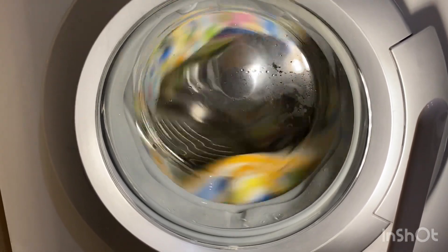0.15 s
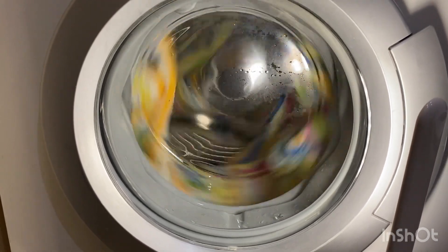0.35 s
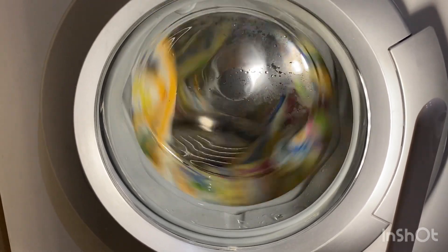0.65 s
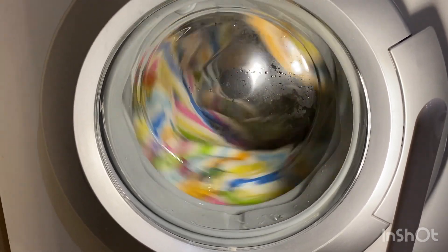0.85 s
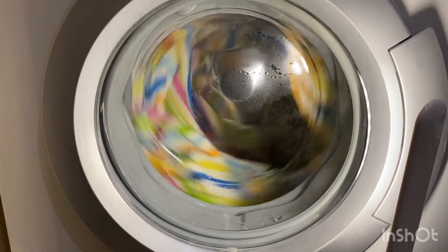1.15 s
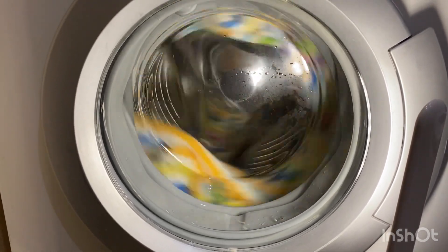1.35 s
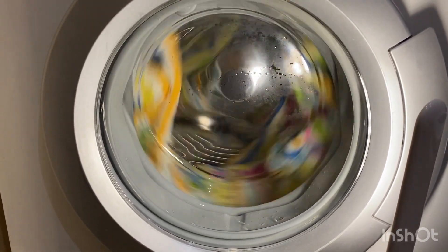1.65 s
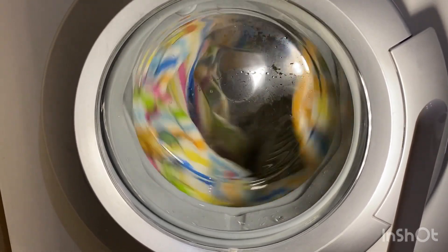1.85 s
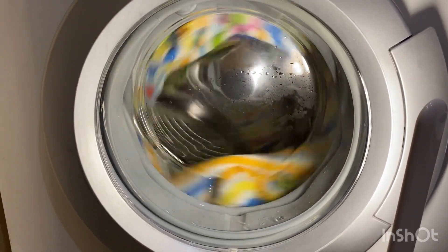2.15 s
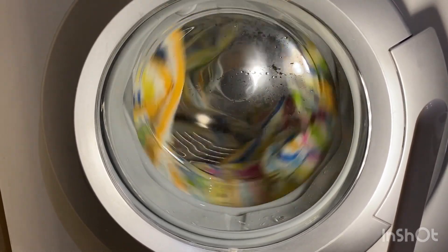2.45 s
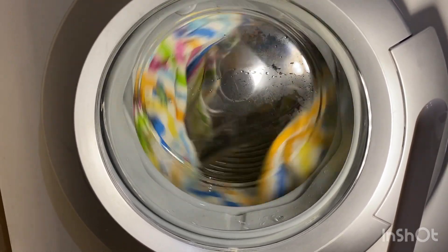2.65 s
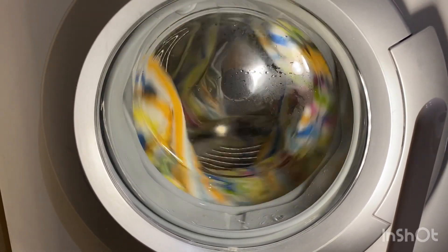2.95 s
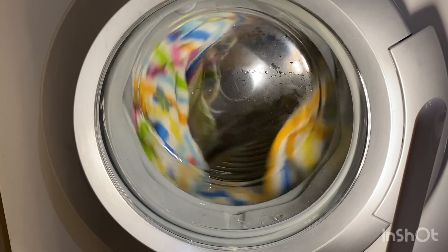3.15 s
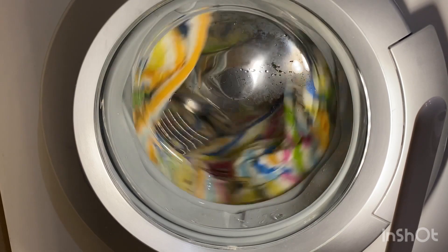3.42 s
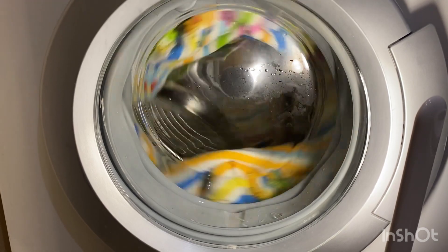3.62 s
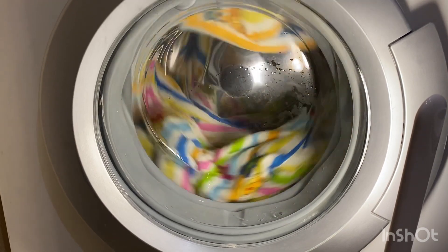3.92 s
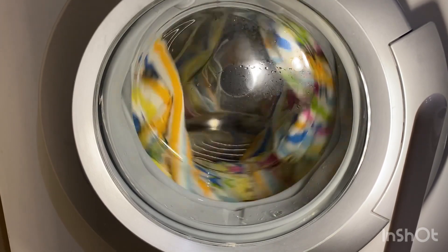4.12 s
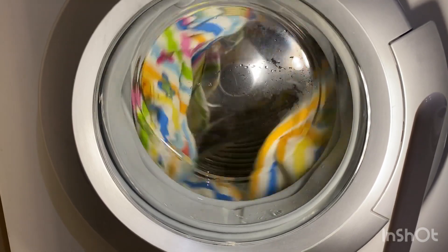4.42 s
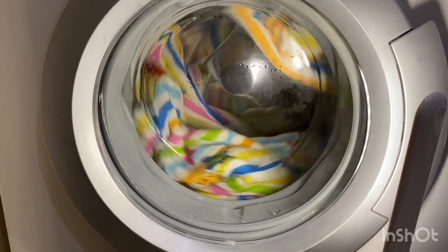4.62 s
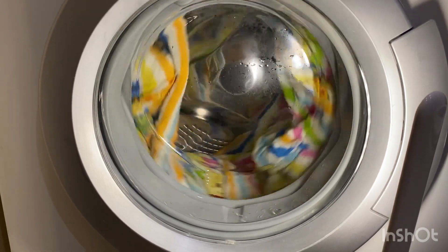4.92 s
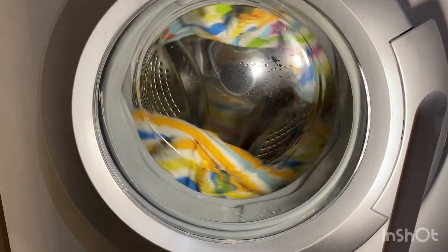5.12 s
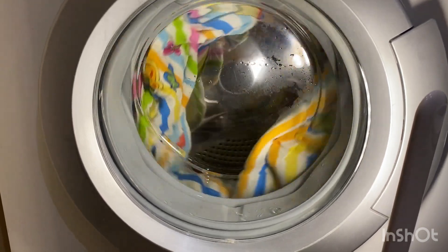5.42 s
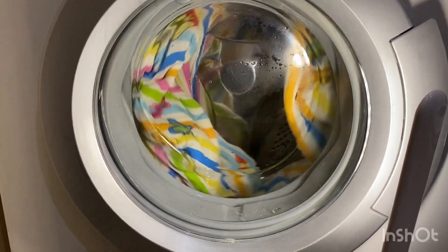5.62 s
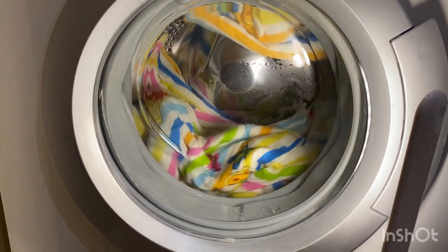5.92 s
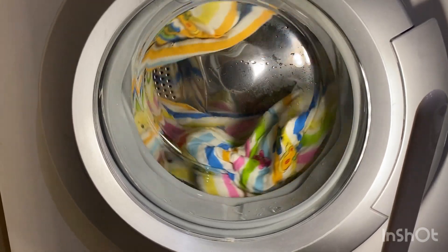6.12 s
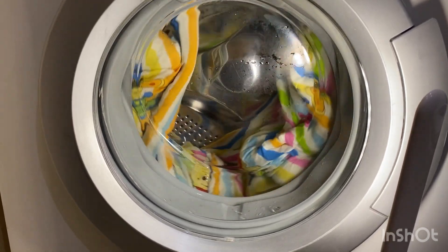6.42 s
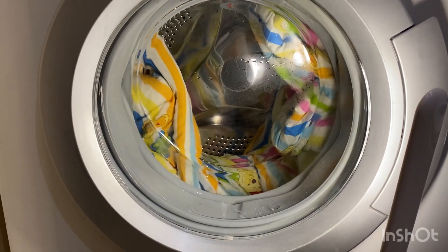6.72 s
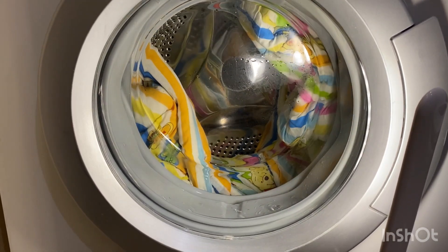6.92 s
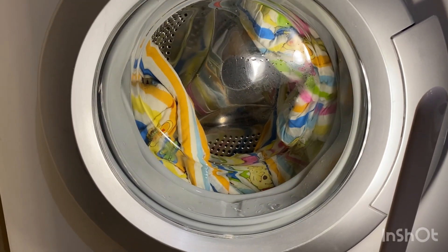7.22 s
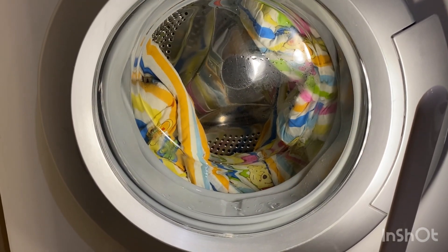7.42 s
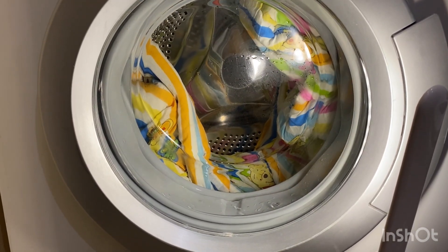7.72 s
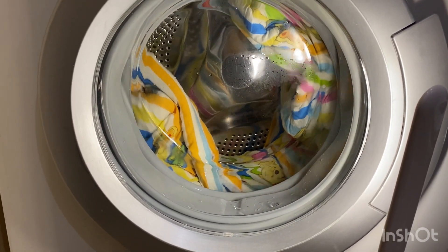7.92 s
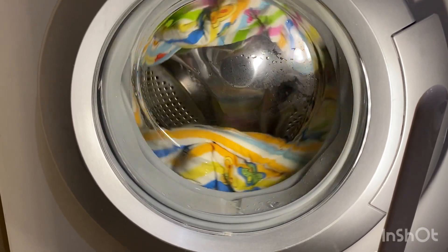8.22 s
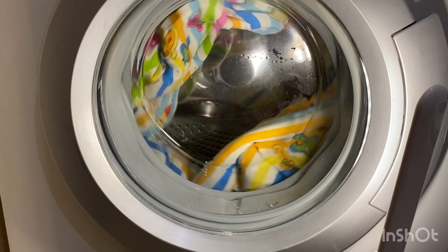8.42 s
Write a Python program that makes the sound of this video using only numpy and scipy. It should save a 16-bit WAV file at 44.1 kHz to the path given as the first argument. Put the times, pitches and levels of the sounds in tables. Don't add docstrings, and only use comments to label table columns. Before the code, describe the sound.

A low electric hum throbs irregularly, with turbulent water rushing and splashing inside a metal cabinet. Over it, a thin drum motor whine and scraping hiss sink in pitch until the drum rests. Wet cloth thuds softly now and then. Near the end a relay snaps and the motor begins to speed up. Close stereo microphone, small indoor room, slightly dulled extreme treble.

```python
import sys
import numpy as np
from scipy import signal
from scipy.fft import rfft, irfft, next_fast_len
from scipy.io import wavfile
from scipy.ndimage import uniform_filter1d

SR = 44100
rng = np.random.default_rng(int(sys.argv[2]) if len(sys.argv) > 2 else 0)


def linear_from_db(decibels):
    return 10 ** (np.asarray(decibels, float) / 20)


def digitize_waveform(pressure):
    field = np.atleast_2d(pressure).T
    bounded = np.clip(field, -1, 1)
    quanta = np.round(bounded * 32767).astype(np.int16)
    wavfile.write(sys.argv[1], SR, quanta)


N = 377496

MAINS_HZ = 50.0
BARS = 12


def evened(x):
    return x / np.sqrt(np.mean(x ** 2) + 1e-20)


def wander(count, size):
    once = uniform_filter1d(rng.standard_normal(count), size=size)
    return evened(uniform_filter1d(once, size=size))


def drift(span_s):
    return wander(N, max(int(span_s * SR), 2))


def read(points, hz):
    f, value = np.transpose(points)
    return np.interp(np.log(hz + 1), np.log(f + 1), value)


def band(x, low_hz, high_hz):
    return signal.sosfilt(signal.butter(2, [low_hz, high_hz], "band", fs=SR, output="sos"), x)


def bumps(rows, t, idle_db, sharpness=1, rise=1):
    few = t[::64]
    bells = 0
    for s, db, half_s in rows:
        reach_s = np.where(few < s, rise * half_s, half_s)
        bells = bells + linear_from_db(db) * np.exp(-sharpness * ((few - s) / reach_s) ** 2)
    return np.interp(t, few, 20 * np.log10(linear_from_db(idle_db) + bells))


def hiss(shape_db, patchy_db, ripple_db):
    frames, hz = N // 1024 + 5, np.fft.rfftfreq(4096, 1 / SR)
    a, b, c, d, patches = rng.standard_normal((frames, len(hz), 5)).T
    patches = uniform_filter1d(patches, size=40, axis=0)
    patches = evened(uniform_filter1d(patches, size=4, axis=1))
    ripple = evened(uniform_filter1d(rng.standard_normal(len(hz)), size=3))
    ripple *= (hz > 950) & (hz < 8000)
    level_db = (shape_db(hz) + ripple_db * ripple)[:, None] + patchy_db * patches
    z = np.array([a + 1j * b, c + 1j * d]) * linear_from_db(level_db)
    return evened(signal.istft(z, nperseg=4096, noverlap=3072)[1][:, :N])


def pump_load(t):
    # time in seconds, hum in dB, half length in seconds,
    # fourth multiple relative to hum in dB.
    gulps = [(0.191, -23, 0.12, -20), (0.393, -25, 0.078, -24), (0.662, -27.8, 0.08, -32.0),
             (0.892, -25.5, 0.16, -20), (1.224, -24.5, 0.15, -20), (1.47, -33, 0.064, -32.0),
             (1.837, -21.5, 0.25, -17.5), (2.355, -28, 0.17, -22.4), (2.51, -28.5, 0.089, -15),
             (2.62, -37.5, 0.17, -6), (2.965, -28.5, 0.15, -27.2), (3.13, -36.1, 0.029, -10),
             (3.294, -23.5, 0.11, -20.5), (3.455, -36, 0.036, -8.0), (3.72, -31, 0.052, -6),
             (3.864, -27.2, 0.29, -24), (4.587, -21, 0.27, -16.5), (4.802, -38, 0.038, -16.1),
             (5.139, -23.5, 0.14, -19), (5.488, -29.5, 0.114, -35), (5.735, -21.6, 0.15, -18),
             (5.97, -25.5, 0.035, -17.9), (6.17, -26, 0.38, -18.5), (6.528, -32.5, 0.038, -23),
             (6.81, -39.4, 0.038, -9), (6.874, -24.5, 0.38, -19.5), (7.348, -26, 0.13, -21),
             (7.69, -20, 0.16, -14), (8.117, -21.0, 0.28, -14.5), (8.37, -51, 0.036, -38)]
    # time in seconds, drop in dB, half length in seconds.
    pockets = [(0.036, 6, 0.015), (0.23, 4.5, 0.04), (0.52, 18, 0.018), (0.82, 11.2, 0.037),
               (1.096, 10.7, 0.036), (2.34, 6, 0.036), (2.667, 6.5, 0.02), (2.788, 12, 0.027),
               (3.18, 1, 0.02), (3.645, 19.5, 0.035), (3.888, 1, 0.02), (4.66, 6, 0.049), (4.956, 8, 0.052),
               (5.216, 12, 0.064), (5.314, 11.5, 0.027), (5.764, 5, 0.045), (6.045, 17.5, 0.087),
               (6.69, 3.5, 0.032), (7.16, 6, 0.054), (7.66, 9.5, 0.076), (7.963, 4.5, 0.049),
               (8.193, 4, 0.066), (8.48, 5.5, 0.02)]
    rise = 0.93
    hum_db = bumps([g[:3] for g in gulps], t, -48, rise=rise)
    fourth_rows = [(s, db + rel_db, half_s) for s, db, half_s, rel_db in gulps]
    fourth_db = bumps(fourth_rows, t, -52.5, sharpness=2.13, rise=rise)
    few = t[::64]
    drops_db = sum(db * np.exp(-((few - s) / half_s) ** 2) for s, db, half_s in pockets)
    air_db = np.interp(t, few, drops_db)
    return hum_db - air_db, fourth_db - 0.65 * air_db


def pump_hum(t, hum_db, fourth_db):
    # time in seconds, level in dB, half length in seconds.
    sings = [(0.12, -49, 0.4), (0.35, -58, 0.04), (0.59, -49, 0.095), (1.09, -43.5, 0.371),
             (1.63, -42, 0.144), (2.07, -44.5, 0.23), (2.35, -43, 0.044), (2.89, -43, 0.12),
             (3.3, -48.5, 0.19), (3.57, -45, 0.043), (3.71, -50, 0.046), (4.22, -41, 0.23),
             (4.66, -41, 0.038), (4.98, -43.5, 0.13), (5.45, -40.5, 0.2), (6.1, -41.5, 0.15),
             (6.49, -43.5, 0.11), (6.69, -42, 0.063), (7.22, -43.5, 0.214), (7.64, -47.5, 0.14),
             (7.87, -43.5, 0.044), (8.05, -56, 0.095), (8.2, -51, 0.051), (8.44, -51, 0.18)]
    # multiple of mains, level in dB rms.
    overtones = [(3, -55.5), (6, -59), (9, -60), (10, -62), (12, -62)]
    turn = 2 * np.pi * MAINS_HZ * t
    panel_db = bumps(sings, t, -59.5)
    shake_db = -39.5 + 0.18 * t + 0.16 * (uniform_filter1d(hum_db, size=4000) + 33.0) + 0.86 * drift(0.091)
    tones = linear_from_db(hum_db + 0.4 * drift(0.031)) * np.cos(2 * turn + 1.62 + 0.34 * drift(0.13))
    tones += linear_from_db(shake_db) * np.cos(turn + 1.6)
    tones += linear_from_db(fourth_db) * np.cos(4 * turn + 0.5 * drift(0.11))
    tones += linear_from_db(panel_db - 1.0) * np.cos(4.99 * turn + drift(0.14))
    for k, db in overtones:
        tones += linear_from_db(db + 2.3 * drift(0.11)) * np.cos(k * turn + 0.95 * drift(0.1))
    return np.sqrt(2) * tones


def cabinet_db(hz):
    # frequency in Hz, level in dB per Hz.
    water = [(25, -30), (45, -16), (75, 13), (130, -1), (300, 0), (420, -5.5), (900, -8), (1050, -9),
             (2000, -12), (2600, -19.5), (4000, -20.5), (6000, -26.5), (7500, -31.5), (15000, -44.5)]
    # frequency in Hz, width in Hz, gain in dB.
    panels = [(73.4, 11, -9.5), (135, 8.5, -3.5), (176, 33, 0), (233, 8.1, -3), (308.4, 9.4, -6),
              (626, 16, 1), (986, 55, -2.5), (1060, 55, 2), (241.3, 21, 5), (332.4, 20.5, 8.5),
              (378, 18, -2.5), (402, 11, 2.5), (455, 11, 3.5), (474, 13, -4), (565, 29.5, 9),
              (690, 25, 1.5), (700, 23, 8.5), (750, 22, 6), (808, 17, 6.5), (833, 21, 7), (910, 37, 8.5),
              (1163, 36, -6.5), (1379, 104, 4.5), (1900, 103, 4.5), (2118, 84, -8), (2255, 130, 7),
              (3120, 200, 5), (3680, 100, 2.5)]
    modes_db = sum(db / (1 + (2 * (hz - f) / width_hz) ** 2) for f, width_hz, db in panels)
    return read(water, hz) - 12 * (hz > 15250) + modes_db


def pump_churn(t, hum_db):
    turn = 2 * np.pi * MAINS_HZ * t
    load = linear_from_db(hum_db + 24)
    throb = 0.16 * np.cos(turn + 0.7) + 0.13 * load * np.cos(2 * turn + 0.4)
    swell = linear_from_db(0.21 * (hum_db - hum_db.mean()) + 0.5 * drift(0.09)) - 1
    slosh = linear_from_db(0.98 * drift(0.016)) - 1
    water = hiss(cabinet_db, patchy_db=0.88, ripple_db=2.3)
    moving = swell * band(water, 290, 1240) + throb * band(water, 400, 2100) + slosh * band(water, 1100, 7000)
    return linear_from_db(-39.5) * (water + moving)


def shaft_hz(t):
    # time in seconds, commutator pitch in Hz.
    speed = [
        (0, 3560),
        (.5, 3267),
        (1, 2995),
        (1.35, 2812),
        (2, 2470),
        (2.8, 2085),
        (6.75, 5),
        (7.8, 5),
        (8.56, 500),
    ]
    s, pitch_hz = np.transpose(speed)
    return np.interp(t, s, pitch_hz) / BARS


def motor_whine(hz):
    # shaft order, level in dB rms, loudest frequency in Hz, reach in Hz.
    orders = [(1, -56, 285, 20), (2.33, -52, 675, 20), (2.48, -51, 660, 22), (2.33, -54, 480, 60),
              (10, -68, 2700, 300), (13, -65, 3050, 200), (13, -63, 2300, 150), (13, -66, 3500, 400),
              (15, -69, 4000, 200), (18, -62, 4400, 130), (24, -64, 6700, 350), (25, -68, 6850, 250)]
    # frequency in Hz, level in dB rms, reach in Hz.
    casing = [(3385, -57, 40), (3265, -65, 30), (3110, -56, 70), (2960, -59, 50), (2850, -58, 25),
              (2550, -63, 60), (3150, -66, 450)]
    turn = 2 * np.pi * np.cumsum(hz * (1 + 0.001 * drift(0.03))) / SR
    whine = np.zeros(N)
    for k, db, peak_hz, reach_hz in orders:
        nearness = np.exp(-((k * hz - peak_hz) / reach_hz) ** 2)
        whine += linear_from_db(db + 2.0 * drift(0.1)) * np.cos(k * turn) * nearness
    pitch_hz = np.arange(4000.)
    rings = sum(linear_from_db(db) * np.exp(-((pitch_hz - f) / reach_hz) ** 2) for f, db, reach_hz in casing)
    whine += np.cos(BARS * turn) * np.interp(BARS * hz, pitch_hz, rings)
    return np.sqrt(2) * whine


def brush_hiss(hz):
    # frequency in Hz, level in dB per Hz.
    brush = [(1500, -9), (3000, 6), (6000, 1.5), (8000, -2), (10000, 0.5), (10800, 2), (11300, 0),
             (12200, 3.5), (14000, -4), (15600, -11.5)]
    flicker_db = 0.52 * drift(0.051) + 0.6 * drift(0.003)
    scrape = hiss(lambda f: read(brush, f) - 40 * (f < 900), patchy_db=1.0, ripple_db=1.8)
    rest_db, db_per_khz = -67, 4.5
    return linear_from_db(rest_db + db_per_khz * BARS * hz / 1000 + flicker_db) * scrape


def relay_ticks(t):
    # time in seconds, peak in dB, t60 in seconds.
    ticks = [
        (5.3218, -47, 0.072),
        (5.4495, -39, 0.08),
        (7.566, -25.5, 0.082),
        (8.0785, -43, 0.08),
        (8.2128, -54, 0.08),
    ]
    # frequency in Hz, level in dB.
    modes = [(2200, -13), (3000, -3), (4000, -3), (4700, -7), (6300, -1), (7500, 0), (11500, -19)]
    out, u = np.zeros(N + SR), t[:SR // 4]
    for s, db, t60_s in ticks:
        ring = sum(linear_from_db(mode_db) * np.sin(2 * np.pi * (f * u + rng.random())) for f, mode_db in modes)
        snap = 1.27 * band(rng.standard_normal(len(u)), 1100, 14000) + 0.41 * ring
        fade = linear_from_db(-60 * u / t60_s) + linear_from_db(-13.5 - 60 * u / 0.25)
        attack = np.minimum(u / 0.0019, 1)
        out[round(s * SR):][:len(u)] += linear_from_db(db - 14.5) * fade * snap * attack
    return out[:N]


def laundry_knocks(t):
    # time in seconds, frequency in Hz, width in Hz, level in dB, length in seconds.
    knocks = [(2.067, 1400, 300, -50.5, 0.035), (2.25, 1370, 300, -46, 0.03),
              (2.682, 1420, 1100, -39.5, 0.032), (3.377, 1600, 1100, -42, 0.038),
              (3.72, 750, 500, -44, 0.078), (5.03, 1530, 800, -50, 0.024),
              (6.508, 1900, 1200, -48.5, 0.059), (7.31, 800, 203, -47, 0.098), (7.578, 1110, 170, -45, .03),
              (8.052, 1585, 500, -47, 0.043), (0.382, 279, 42, -40.5, .11), (1.72, 340, 50, -45, 0.12),
              (3.928, 328, 30, -41.5, 0.089), (5.267, 340, 43, -44, 0.16), (6.148, 336, 40, -48.5, 0.13),
              (8.2, 299, 16, -44, .12), (8.503, 344, 26, -44, 0.13)]
    out, u = np.zeros(N + SR), t[:SR // 4]
    for s, hz, width_hz, db, length_s in knocks:
        bell = np.exp(-((u - 0.1) / (0.5 * length_s)) ** 2)
        edges_hz = max(hz - width_hz / 2, 50), hz + width_hz / 2
        noise = band(rng.standard_normal(len(u)), *edges_hz)
        thud = evened(band(noise, *edges_hz))
        knock = thud + 0.52 * np.sin(2 * np.pi * hz * u)
        out[round((s - 0.1) * SR):][:len(u)] += linear_from_db(db - 2.0) * bell * knock
    return out[:N]


def scene():
    # frequency in Hz, likeness 0-1.
    likeness = [(60, 0.83), (250, 0.9), (500, 0.47), (1000, 0.48), (1900, 0.4), (3000, 0.36), (4000, 0.72),
                (5500, 0.35), (6500, 0.64), (7200, 1), (16000, 0.85)]
    # frequency in Hz, left minus right in dB.
    balance = [(60, 3), (110, 1.5), (200, 2), (380, 3.5), (700, 3.0), (1290, 2.5), (2380, -0.5),
               (4400, 4.5), (8120, 1.5), (15000, -1)]
    t = np.arange(N) / SR
    hum_db, fourth_db = pump_load(t)
    motor_hz = shaft_hz(t)
    clear = pump_hum(t, hum_db, fourth_db) + relay_ticks(t) + laundry_knocks(t)
    noise = pump_churn(t, hum_db) + brush_hiss(motor_hz)
    size = next_fast_len(N)
    hz = np.fft.rfftfreq(size, 1 / SR)
    clear, whine, direct, scatter = rfft([clear, motor_whine(motor_hz), noise[0], noise[1]], size)
    same = np.clip(read(likeness, hz), 0, 1)
    port_hz, port_turn_hz = 6900, 4260
    lead = np.exp(2j * np.pi * np.maximum(hz - port_hz, 0) / port_turn_hz)
    reflected = np.interp(hz, [300, 900, 5500, 6500], [0, 1, 1, 0])
    lead *= np.exp(0.8j * wander(len(hz), 1500) * reflected)
    left = clear + whine + direct
    right = lead * (clear + linear_from_db(-4) * whine + same * direct + np.sqrt(1 - same ** 2) * scatter)
    lean = linear_from_db(read(balance, hz) / 2)
    return irfft([left * lean, right / lean], size)[:, :N]


def top_cut(x):
    return signal.sosfilt(signal.butter(12, 16390, fs=SR, output="sos"), x)


def record(dry):
    # frequency in Hz, gain in dB.
    treble = [(12400, 0), (12950, -4), (13150, -30), (13700, -30), (13900, 2), (15100, 3), (15300, -7)]
    lowpass = signal.firwin(511, 15700, window=("kaiser", 9), fs=SR)
    hz = np.linspace(0, SR / 2, 513)
    colour = signal.firwin2(511, hz, linear_from_db(read(treble, hz)) * (hz < hz[-1]), fs=SR)
    mix = signal.oaconvolve(dry, lowpass[None], "same")
    mix = signal.oaconvolve(mix, colour[None], "same")
    return top_cut(mix)


dry = scene()
out = record(dry)
digitize_waveform(out)
```